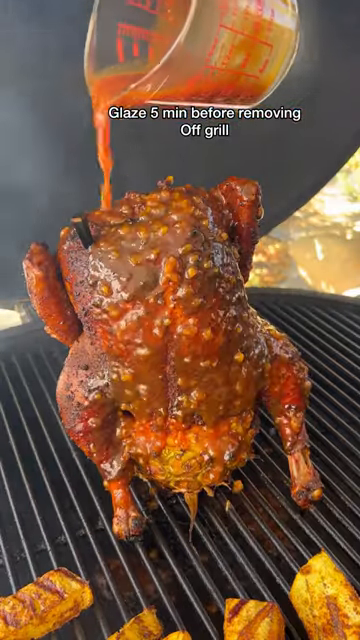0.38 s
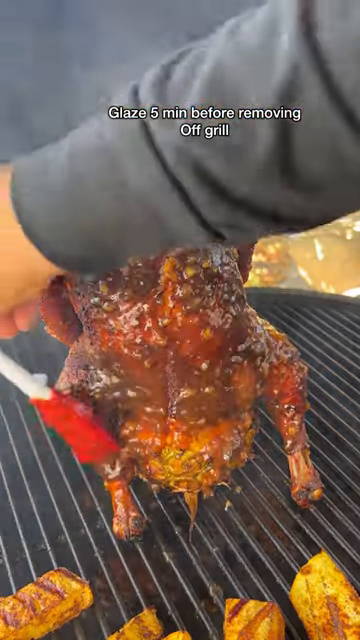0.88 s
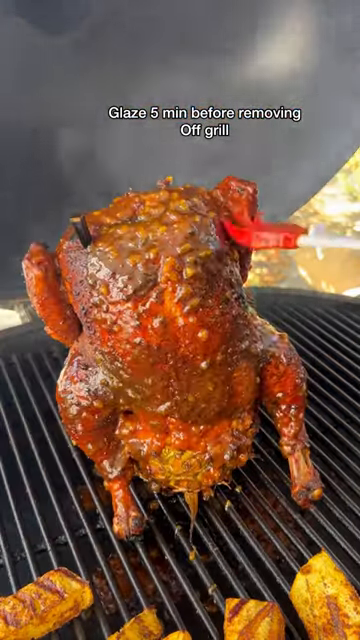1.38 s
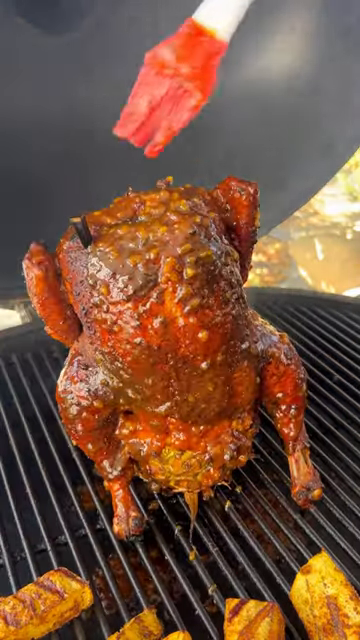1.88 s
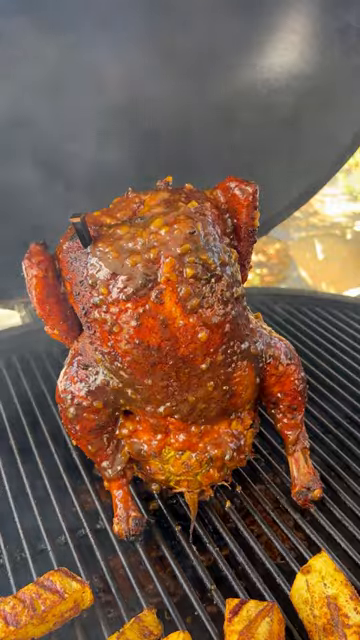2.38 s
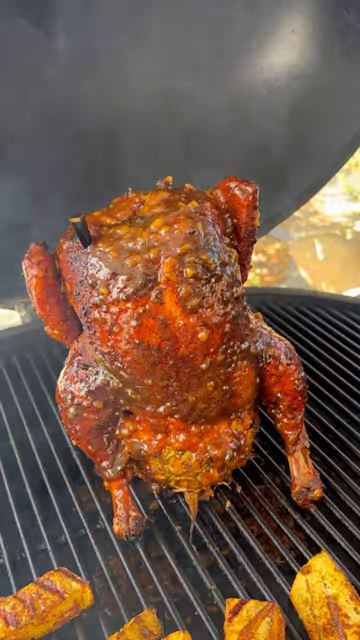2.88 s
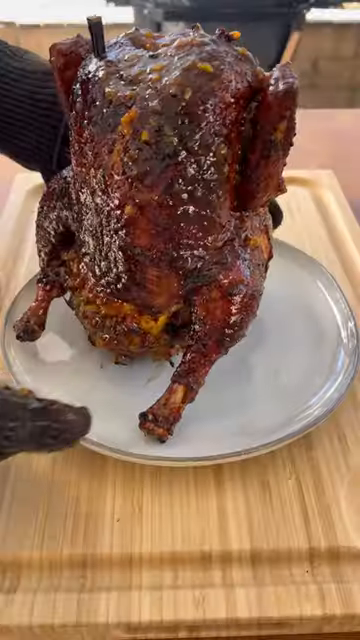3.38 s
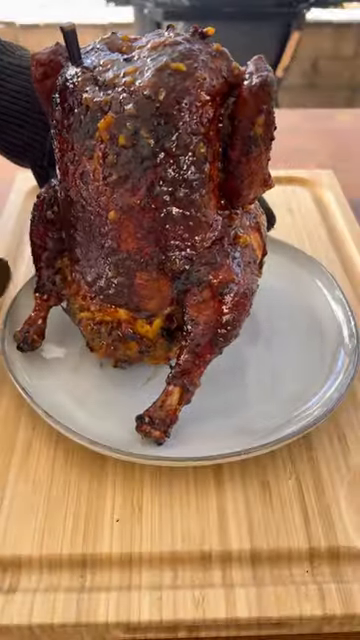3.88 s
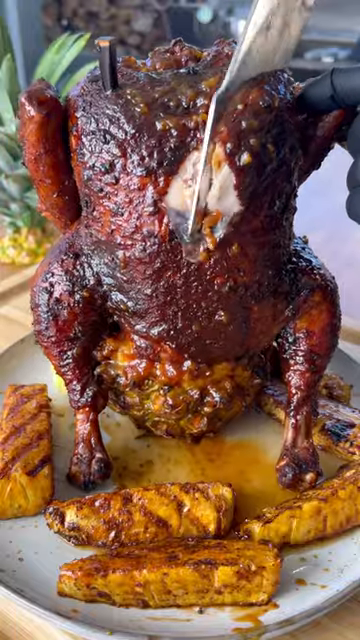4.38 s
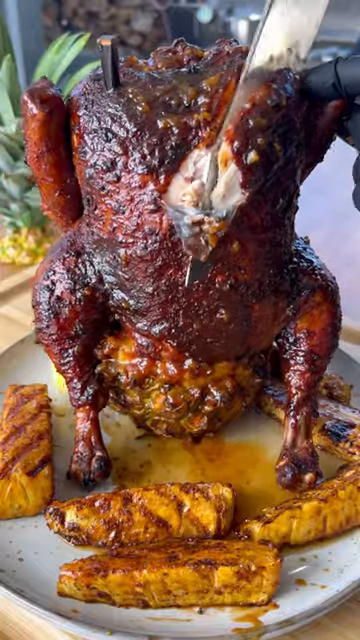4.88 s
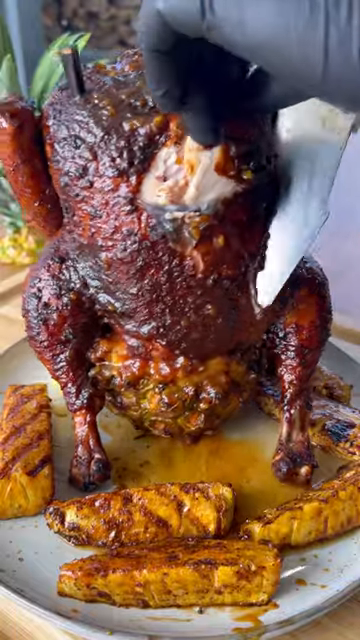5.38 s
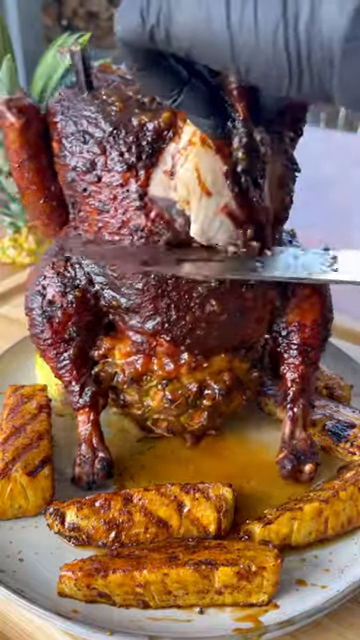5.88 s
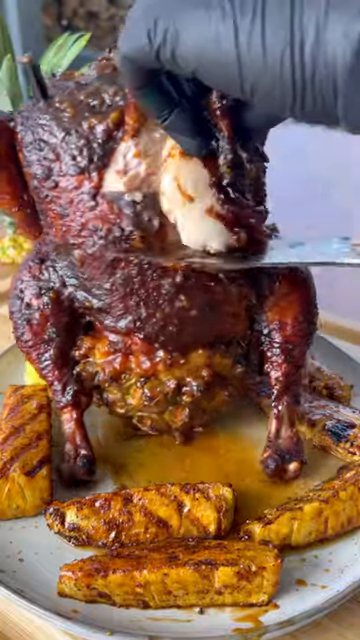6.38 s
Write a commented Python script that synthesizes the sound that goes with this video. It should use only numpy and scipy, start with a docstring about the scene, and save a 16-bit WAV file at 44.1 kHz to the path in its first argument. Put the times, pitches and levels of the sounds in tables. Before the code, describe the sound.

A steady, crackling wet sizzle, wide and near, dominates the first three seconds, gradually losing some treble. It stops suddenly, leaving soft hum and outdoor rumble, a few dull plate clinks and gritty scuffs, and a distant remnant of frying. The last part is quiet carving heard closely: grainy scrapes, moist rustles, scattered crisp snaps and one dull knock. Edits are marked by tiny dips in level.

```python
"""At an outdoor hot grill, then at a table: glaze sizzles close by, a bird is set on a plate and carved.
Bursts in flickering noise make the boiling glaze; single bubbles, snaps and clinks are decaying modes.
Wet friction of knife and gloves is grainy noise gated in strokes; the plate's foot scuffs as gritty noise.
A mains-driven machine hums in wavering sines over outdoor rumble; the level dips briefly at set times."""
import sys
import numpy as np
from scipy import signal
from scipy.fft import rfft, irfft, next_fast_len
from scipy.io import wavfile
from scipy.ndimage import uniform_filter1d

SR = 44100
rng = np.random.default_rng(int(sys.argv[2]) if len(sys.argv) > 2 else 0)


def unload_wav(signal):
    """Save mono or channel-first audio to the path in sys.argv[1] as 16-bit WAV at rate SR, clipped to [-1, 1]."""
    wavfile.write(
        sys.argv[1],
        SR,
        np.round(np.clip(np.atleast_2d(signal).T, -1, 1) * 32767).astype(np.int16),
    )


def decibels_to_gain(level_db):
    """Convert a level in decibels to a linear amplitude gain (20 dB per decade)."""
    exponent = np.asarray(level_db, float) / 20
    return 10 ** exponent


N = 287080
T = np.arange(N) / SR
SIZE = next_fast_len(N)
HZ = np.maximum(np.arange(SIZE // 2 + 1) * SR / SIZE, 1)

# brief level dips: t/s
DIPS = [0.501, 1.284, 2.201, 3.104, 4.093, 5.231, 5.737]
HUM_SHIFT, GRILL_END, PLATE_END, BRIGHT_START = DIPS[2], DIPS[3], DIPS[4], DIPS[5]  # t/s
DIP_FALL_S, DIP_GAIN, DIP_RISE_S = 0.0015, 0.16, 0.025

# glaze boiling on the grate: t/s, level before the treble change/dB, treble change/dB
SIZZLE = [(0, -30, 1.5), (.49, -29.5, 1), (1.3, -29.5, 0), (1.7, -28.5, -0.5), (2.19, -28.5, -1),
          (2.24, -29, -3), (2.6, -30.5, -3.5), (3.1, -29.5, -5)]
# spectrum of the near sizzle: f/Hz, density level/dB per Hz
SIZZLE_COLOUR = [(200, -40), (330, -12), (430, -13), (660, -4), (825, -9), (960, -1.5), (1100, -4.5),
                 (2000, -3), (2900, -5.3), (3800, -4), (5200, -4.8), (5800, 0), (8300, 1.5), (10500, -1),
                 (12500, -6), (15500, -3.5)]
# stereo width of the near sizzle: f/Hz, side minus mid level/dB
SIZZLE_SIDE = [(400, -14), (750, -9), (1200, -21), (1800, -28), (2700, -5.5), (3300, -13), (3900, -36),
               (4800, -6), (6000, -8), (9000, -8.5), (15000, -5.5)]
TREBLE_HZ = 2900
# the grill heard from the table, before its closing fade: t/s, level/dB
FAR = [(3.119, -78), (3.124, -51), (3.32, -55), (4.085, -55.5), (4.115, -58), (4.175, -55.5), (4.22, -73)]
# spectrum of the far sizzle: f/Hz, density level/dB per Hz
FAR_COLOUR = [(400, -6.5), (750, 0.5), (1100, -13), (2200, -6.5), (3300, -5), (5000, -4.5), (7500, -0.5),
              (10000, -4.5), (12000, -14), (15500, -9)]
# stereo width of the other noises: f/Hz, side minus mid level/dB
QUIET_SIDE = [(60, -21), (200, -21), (380, -10), (700, 0), (1200, -4), (1900, -13), (2900, -4), (4000, -12),
              (5000, -5), (7000, -9), (11000, -7), (12500, -4), (15000, -7)]

# single bubbles: least peak over the sizzle level and mean excess, near 3 dB; initial pitch range
POPS, POP_DB, POP_SCATTER_DB, POP_HZ = 420, -5.5, 3, (2210, 13200)
# cycles to fade 60 dB: 2 plus up to this many; half the fractional pitch rise per cycle
POP_EXTRA_CYCLES, POP_GLIDE = 47, 0.0025

# spectrum of the outdoor rumble: f/Hz, density level/dB per Hz
RUMBLE = [(22, -19), (55, 0.5), (90, -5), (125, -0.5), (160, -6), (200, -10), (290, -12), (340, -8),
          (380, -13.5), (630, -23.5), (1000, -31), (1600, -37.5)]
RUMBLE_DB, MAINS_HZ = -48, 60
# bass width of the rumble up to PLATE_END: f/Hz, side minus mid level/dB
GRILL_BASS_SIDE = [(40, -1), (70, -4), (110, -10), (200, -16), (380, -10), (700, -3)]
# mains lines before wavering: multiple of the mains, rms level by the grill/dB, by the table/dB
HUM = [(1, -65, -77), (2, -50, -50), (4, -65, -55.5)]

# glaze, sticky skin and meat snapping: t/s, nominal peak level/dB, pitch f/Hz, nominal spit level/dB
TICKS = [(0.098, -14.5, 1340, -41), (3.241, -37, 4000, -55), (4.168, -30, 6600, -37),
         (4.1725, -31, 7000, -42), (4.262, -38, 5500, -70), (4.411, -37, 6000, -63), (4.54, -44, 6500, -54),
         (4.567, -36, 5200, -53), (4.574, -34, 2690, -41), (4.5826, -36, 5330, -58),
         (4.599, -41, 5000, -56), (4.641, -40, 2800, -60), (4.6725, -29, 2610, -63),
         (4.765, -50, 7000, -50), (4.779, -45, 6500, -58), (4.839, -41, 7000, -52), (4.857, -45, 4800, -52),
         (5.0065, -40, 3960, -54), (5.056, -50, 6500, -62), (5.105, -44, 10000, -48),
         (5.1372, -29, 6300, -42), (5.154, -30, 3060, -52), (5.3028, -40, 6540, -52),
         (5.376, -34, 8240, -45), (5.41, -46, 8030, -47), (5.495, -43, 6800, -72),
         (5.527, -36.5, 2000, -64), (5.543, -39, 5500, -50), (5.6113, -36, 7340, -42),
         (5.651, -39, 7600, -62), (5.6834, -50, 4190, -53), (5.7625, -46, 2700, -75),
         (5.784, -40, 7000, -68), (5.7982, -39, 2160, -70), (5.841, -40, 2350, -51),
         (5.846, -37, 7000, -44), (5.954, -39, 6800, -44), (5.965, -39, 8400, -51), (5.986, -39, 7300, -60),
         (5.994, -42, 3200, -70), (6.047, -42, 2600, -49), (6.068, -42, 7000, -54), (6.092, -36, 2170, -56),
         (6.1223, -38, 5000, -38), (6.2957, -34, 1800, -68), (6.327, -29, 7800, -56),
         (6.4132, -35, 1310, -51), (6.4754, -39, 6860, -64)]
# bands of the spit, before and after BRIGHT_START (later clicks brighter, thinner): lower f/Hz, upper f/Hz
SPIT_HZ = [(4000, 11000), (8500, 16000)]
WET_TAIL_DB, WET_TAIL_S = -20, 0.0021  # short rough smear, decay to 1/e

# the plate's foot scuffing over the board: start t/s, end t/s, nominal level/dB
SCUFFS = [(3.12, 3.243, -67), (3.42, 3.61, -66)]
# plate rocking: t/s, ring level/dB, knock level before its band filter/dB, upper over lower twin mode/dB
CLINKS = [(3.1225, -56, -39, 6), (3.19, -61, -40, 0.1), (3.424, -49.5, -42, 2), (3.455, -61, -48, 3),
          (3.504, -53, -43, -5), (3.537, -53, -40, 0.1), (3.549, -60, -40, -4), (3.577, -57, -39, 0.1),
          (3.587, -54, -42, 8)]
# nominal modes of the plate: f/Hz, relative level/dB, t60 of a clink/s, share of the twin tilt
PLATE = [(1640, -4, 0.085, 0), (2715, -3.5, 0.08, -.5), (2890, -3.5, .07, .5), (4220, -6, 0.07, 0)]

# strokes on meat: start t/s, length t/s, rustle, dull scrape and fine spray level at mid-stroke/dB
STROKES = [(4.207, 0.25, -66.5, -68.5, -76), (4.537, 0.22, -60, -64.5, -72), (4.825, 0.2, -65, -85, -73),
           (5.102, 0.12, -56.5, -72, -72), (5.24, 0.075, -61.5, -64, -70), (5.361, 0.069, -64.5, -71, -70),
           (5.49, 0.11, -64.5, -64, -84), (5.597, 0.11, -65, -66, -80), (5.76, 0.14, -68.5, -72, -77),
           (5.927, 0.12, -67, -66, -69), (6.034, 0.14, -64, -67, -68), (6.172, 0.15, -63, -61.5, -72),
           (6.326, 0.12, -64, -67.5, -65), (6.48, 0.051, -64.5, -70, -88)]
# hands resting on the meat between strokes: rustle, scrape, spray level/dB
REST_DB = (-78.5, -71.5, -98)
STROKE_ATTACK_S, STROKE_RELEASE_S, STROKE_SWELL_DB = 0.0091, 0.023, 6
# spectrum of the rustle: f/Hz, density level/dB per Hz
RUSTLE_COLOUR = [(2200, -23), (2800, -24), (3600, -7), (4800, -9.5), (6400, -1.5), (7600, -4),
                 (10400, -6.5), (11800, -36)]
# spectrum of the dull scrape: f/Hz, density level/dB per Hz
SCRAPE_COLOUR = [(700, -7), (1200, -10), (1800, -7), (2600, -9.5), (3400, -16), (5000, -16)]
# spectrum of the fine spray: f/Hz, density level/dB per Hz
SPRAY_COLOUR = [(9000, -25), (12000, -6), (14000, 0), (15800, 2.5)]
BLADE_HZ, BLADE_DB = (2470, 3200), -4  # ring of the blade, up to BRIGHT_START

# faint snaps over the strokes: least peak over the rustle, scatter, spit relative to snap
CRACKLES, CRACKLE_DB, CRACKLE_SCATTER_DB, CRACKLE_TREBLE_DB = 240, 11.5, 1.8, -9
CRACKLE_HZ = (1900, 7500)

# dull bump of the knife handle or a hand: nominal level/dB, pitch f/Hz, t60/s
BUMP = (-48, 760, 0.063)
BUMP_S = 5.553

# level balance of the two ports: f/Hz, left minus right level/dB
BALANCE_DB = [(60, .5), (450, 2.1), (750, 0)]
# the right port hears the treble first: f/Hz, phase by which left leads/rad
PORT_PHASE = [(5000, 0), (6800, -.95), (8000, -.75), (9200, -1.4), (12000, -1.35), (15500, -1.75)]
TOP_HZ = 16000


def over_hz(points):
    """Transfer function: level interpolated over logarithmic frequency, as a gain."""
    hz, db = np.transpose(points)
    return decibels_to_gain(np.interp(np.log(HZ), np.log(hz), db))


def over_time(table):
    """Linear interpolation: every column of a curve at every sample."""
    s, *columns = np.transpose(table)
    return [np.interp(T, s, column) for column in columns]


def shaped(x, gain):
    """Linear filtering: multiplication of the spectrum by a gain."""
    return irfft(rfft(x, SIZE) * gain, SIZE)[..., :N]


def band_pass(order, hz):
    """Band selection: Butterworth sections between two frequencies."""
    return signal.butter(order, hz, "band", fs=SR, output="sos")


def walk(rate):
    """Slow random modulation: Gaussian levels held 1 / rate s, then averaged twice."""
    k = int(SR / rate)
    held = np.repeat(rng.standard_normal(N // k + 1), k)
    return uniform_filter1d(uniform_filter1d(held, k), k)[:N]


def swarms(x, patchy_db):
    """Clustering of bubbles of one size: narrow patches of pitch swell and fade for some 20 ms."""
    cells = signal.stft(x, nperseg=512)[2]
    patch = uniform_filter1d(rng.standard_normal(cells.shape[1:]), size=3, axis=1)
    gain = decibels_to_gain(patchy_db * patch / np.std(patch))
    return signal.istft(cells * gain, nperseg=512)[1][:, :N]


def bubbles(colour, side, rate, scatter_db, pop_db, flicker_db, flicker_rate, patchy_db):
    """Shot noise: half-octave bands of hiss, each with its own bursts and flicker; mid (rms 1) and side."""
    out, shared = np.zeros((2, N)), walk(2 * flicker_rate)
    gain = over_hz(colour) * np.array([np.ones(len(HZ)), over_hz(side)])
    centres = 2 ** np.arange(4, 14.5, .5)
    inside = (centres > colour[0][0] * .9) & (centres < colour[-1][0] * 1.2)
    for centre in centres[inside]:
        band = np.cos(np.pi * np.clip(np.log2(HZ / centre), -.5, .5))
        chance, sign, size = rng.random((3, N))
        strength = decibels_to_gain(pop_db - scatter_db * np.log(size + .03))
        burst = (chance < rate / SR) * np.sign(sign - .5) * strength
        # bursts are half as strong in the side, before its width gain
        drive = rng.standard_normal((2, N)) + burst * np.sqrt(SR / centre) * np.array([[1], [.5]])
        flicker = decibels_to_gain(flicker_db * (walk(flicker_rate) + shared))
        out += shaped(drive, gain * band) * flicker
    out = swarms(out, patchy_db)
    return out / np.std(out[0])


def ring(hz, t60):
    """Damped free vibration: one exponentially decaying mode, pushed over its first cycle."""
    t = T[:SR // 8]
    return np.sin(2 * np.pi * hz * t) * np.exp(-np.log(1000) * t / t60) * np.minimum(t * hz, 1)


def add(out, s, sound):
    """Superposition: mix a short sound in at time s."""
    i = int(s * SR)
    out[:, i:i + sound.shape[-1]] += sound[..., :N - i]


def grill():
    """Boiling as shot noise: near sizzle up to GRILL_END, then the same boiling from further off."""
    near = bubbles(SIZZLE_COLOUR, SIZZLE_SIDE, rate=70., scatter_db=1.5, pop_db=1.5,
                   flicker_db=0.51, flicker_rate=14., patchy_db=2.5)
    far = bubbles(FAR_COLOUR, QUIET_SIDE, rate=50., scatter_db=3.1, pop_db=6.,
                  flicker_db=1.1, flicker_rate=20., patchy_db=3.)
    level_db, treble_db = over_time(SIZZLE)
    low = shaped(near, 1 / (1 + (HZ / TREBLE_HZ) ** 2))
    near = (low + (near - low) * decibels_to_gain(treble_db)) * decibels_to_gain(level_db)
    closing_fade = np.clip((FAR[-1][0] - T) / 0.034, 0, 1)
    return np.where(T < GRILL_END, near, far * decibels_to_gain(over_time(FAR)[0]) * closing_fade)


def pops():
    """Bubble resonance: larger bubbles burst singly, from dry spits to short rising rings."""
    out, t = np.zeros((2, N)), T[:600]
    for when, size, pitch, pan, life in rng.random((POPS, 5)):
        hz = POP_HZ[0] * (POP_HZ[1] / POP_HZ[0]) ** pitch
        cycles = 2 + POP_EXTRA_CYCLES * life ** 2
        decay = np.exp(-np.log(1000) * t * hz / cycles)
        tone = np.sin(2 * np.pi * hz * t * (1 + POP_GLIDE * hz * t))
        sound = tone * decay * np.minimum(t * hz, 1)
        gain = decibels_to_gain(POP_DB - POP_SCATTER_DB * np.log(1 - .98 * size))
        # higher pops spread wider
        add(out, when * (GRILL_END - .02), gain * sound * np.array([[1], [pitch * (pan - .5)]]))
    return out * decibels_to_gain(over_time(SIZZLE)[0])


def outdoors():
    """Broadband rumble and harmonic hum: noise, wider in the bass at first, and wavering mains lines."""
    rumble = decibels_to_gain(RUMBLE_DB) * bubbles(RUMBLE, [(100, 0)], rate=0., scatter_db=0., pop_db=0.,
                                      flicker_db=0.83, flicker_rate=9.4, patchy_db=1.0)
    wide, narrow = [shaped(rumble[1], over_hz(side)) for side in (GRILL_BASS_SIDE, QUIET_SIDE)]
    drift = 0.1 * walk(5.)  # rad
    hum = np.zeros(N)
    for k, grill_db, table_db in HUM:
        level_db = np.interp(T, [HUM_SHIFT, GRILL_END], [grill_db, table_db]) + 0.8 * walk(15.0)
        hum += np.sqrt(2) * decibels_to_gain(level_db) * np.sin(round(k) * (2 * np.pi * MAINS_HZ * T + drift))
    return np.array([rumble[0] + hum, np.where(T < PLATE_END, wide, narrow)])


def ticks():
    """Impulsive excitation: each snap rings a few rough cycles, with overtone, thud and bright spit."""
    out, rows, t = np.zeros((2, N)), TICKS + crackles(), T[:SR // 8]
    bright = [band_pass(2, hz) for hz in SPIT_HZ]
    for (s, db, hz, treble_db), noise in zip(rows, rng.standard_normal((len(rows), SR // 8))):
        rough = 1 + 0.26 * uniform_filter1d(noise, size=14)
        snap = ring(hz, 5.1 / hz + 0.0009) * rough
        snap = snap + 0.12 * ring(min(2.1 * hz, 9000.), 8.7 / hz)  # overtone
        snap = snap + 0.27 * ring(hz / 2, 3.6 / hz)  # thud
        onset = snap[:64]
        smear = np.convolve(noise[::-1] * np.exp(-t / WET_TAIL_S), onset)[:SR // 8]
        snap = snap + decibels_to_gain(WET_TAIL_DB) * smear / np.linalg.norm(onset)
        spit = signal.sosfilt(bright[int(s > BRIGHT_START)], noise * np.exp(-t / 0.0006))
        pan = np.array([[1], [0.56 * np.tanh(noise[0])]])
        add(out, s, (decibels_to_gain(db) * snap + decibels_to_gain(treble_db) * spit) * pan)
    return out


def scuffs():
    """Friction excitation: gritty rubbing keeps the plate's modes faintly alive."""
    grit = rng.standard_normal(N) * decibels_to_gain(4.5 * walk(150.))
    body = signal.sosfilt(band_pass(2, [900, 5000]), grit)
    # the modes decay twice as fast as in a clink
    modes = sum(decibels_to_gain(db) * ring(hz, t60 / 2) for hz, db, t60, _ in PLATE)
    rings = signal.fftconvolve(grit, modes)[:N]
    gain = sum(decibels_to_gain(db) * np.clip(np.minimum(T - a, b - T) / 0.017, 0, 1) for a, b, db in SCUFFS)
    return gain * (body / np.std(body) + 0.74 * rings / np.std(rings)) * np.array([[1], [.05]])


def plate():
    """Modal impact: every rock is a short rough knock that strikes the modes with new strengths."""
    out = np.zeros((2, N))
    knock_band = band_pass(2, [1200, 4900])
    for row, noise in zip(CLINKS, rng.standard_normal((len(CLINKS), SR // 8))):
        s, ring_db, knock_db, twin_db = row
        clink = np.zeros(SR // 8)
        for (hz, db, t60, share), r in zip(PLATE, noise):
            strength = decibels_to_gain(db + share * twin_db + 1.5 * np.tanh(r))
            clink += strength * ring(hz * (1 + 0.01 * r), t60)
        knock = signal.sosfilt(knock_band, noise * np.exp(-T[:SR // 8] / 0.0028))
        add(out, s, (decibels_to_gain(ring_db) * clink + decibels_to_gain(knock_db) * knock) * np.array([[1], [.05]]))
    return out


def strokes():
    """Addition of powers: gains of rustle, scrape and spray; a stroke bites, swells and lets go."""
    power = np.outer(decibels_to_gain(np.array(REST_DB)) ** 2, T > STROKES[0][0] - STROKE_RELEASE_S)
    for s, length, *db in STROKES:
        t = T - s
        swell = decibels_to_gain(STROKE_SWELL_DB * (np.sin(np.pi * np.clip(t / length, 0, 1)) - 1))
        release = np.exp(-np.maximum(t - length, 0) / STROKE_RELEASE_S)
        shape = np.clip(t / STROKE_ATTACK_S, 0, 1) * swell * release
        power = power + np.outer(decibels_to_gain(np.array(db)), shape) ** 2
    return np.sqrt(power)


def carving():
    """Friction noise: wet strokes of a rustle, a duller scrape and a fine spray, grainier than the sizzle."""
    rustle_gain, scrape_gain, spray_gain = strokes()
    rustle = bubbles(RUSTLE_COLOUR, QUIET_SIDE, rate=200., scatter_db=3.0, pop_db=10.0,
                     flicker_db=2.5, flicker_rate=56.0, patchy_db=0.0)
    scrape = bubbles(SCRAPE_COLOUR, QUIET_SIDE, rate=110., scatter_db=-0.5, pop_db=4.5,
                     flicker_db=2.5, flicker_rate=32.0, patchy_db=3.0)
    spray = bubbles(SPRAY_COLOUR, QUIET_SIDE, rate=110., scatter_db=3.1, pop_db=8.,
                    flicker_db=2.5, flicker_rate=30., patchy_db=3.)
    blade = signal.sosfilt(band_pass(1, BLADE_HZ), scrape)
    rustle = rustle + decibels_to_gain(BLADE_DB) * blade * (T < BRIGHT_START)
    return rustle * rustle_gain + scrape * scrape_gain + spray * spray_gain


def crackles():
    """Random point process: rows of faint snaps, their level following the rustle under way."""
    when, size, pitch = rng.random((CRACKLES, 3)).T
    s = STROKES[0][0] + when * (T[-1] - STROKES[0][0])
    rustle_db = 20 * np.log10(np.interp(s, T, strokes()[0]))
    db = rustle_db + CRACKLE_DB - CRACKLE_SCATTER_DB * np.log(1 - size)
    hz = CRACKLE_HZ[0] * (CRACKLE_HZ[1] / CRACKLE_HZ[0]) ** pitch
    return list(zip(s, db, hz, db + CRACKLE_TREBLE_DB))


def bump():
    """Damped impact: a low rough ring and a weaker one above it."""
    db, hz, t60 = BUMP
    out = np.zeros((2, N))
    rough = 1 + 4.3 * uniform_filter1d(rng.standard_normal(SR // 8), size=30)
    knock = rough * (ring(hz, t60) + 0.31 * ring(2.1 * hz, t60))
    add(out, BUMP_S, decibels_to_gain(db) * knock * np.array([[1], [.2]]))
    return out


def scene():
    """Linear superposition: mid and side of all sources become left and right."""
    mid, side = grill() + pops() + outdoors() + ticks() + scuffs() + plate() + carving() + bump()
    return np.array([mid + side, mid - side])


def band_limit(x):
    """A steep low-pass at the top of the band."""
    return signal.sosfilt(signal.butter(12, 17090, fs=SR, output="sos"), x)


def record(dry):
    """Two-port reception: ports differ in level and treble phase; the top is cut, the level dips briefly."""
    ports = over_hz(BALANCE_DB) * np.exp(1j * np.interp(HZ, *np.transpose(PORT_PHASE)))
    split = ports ** np.array([[.5], [-.5]])  # half of the difference to each port
    top_cut = np.clip((TOP_HZ - HZ) / 250, 0, 1) ** 2
    mix = shaped(dry, split * top_cut)
    for dip in DIPS:
        mix = mix * np.interp(T - dip, [-DIP_FALL_S, 0, DIP_RISE_S], [1, DIP_GAIN, 1])
    return band_limit(mix)


dry = scene()
out = record(dry)
unload_wav(out)
```